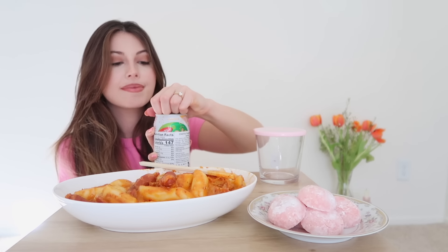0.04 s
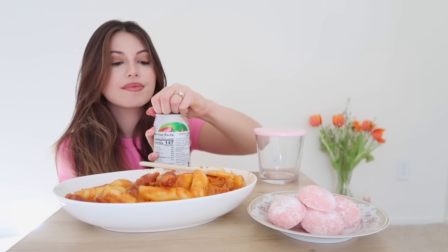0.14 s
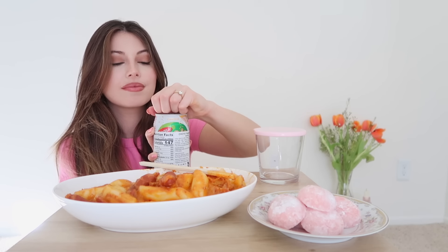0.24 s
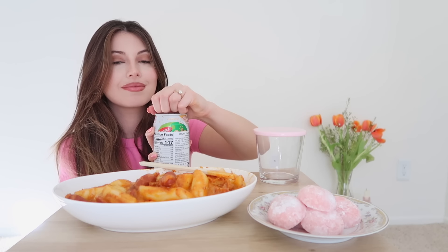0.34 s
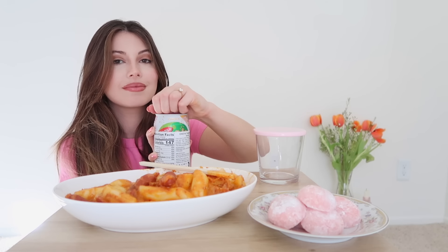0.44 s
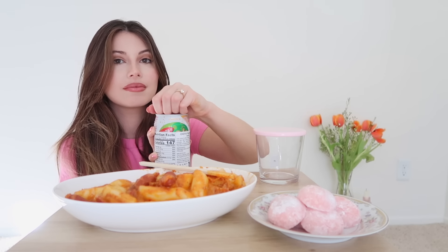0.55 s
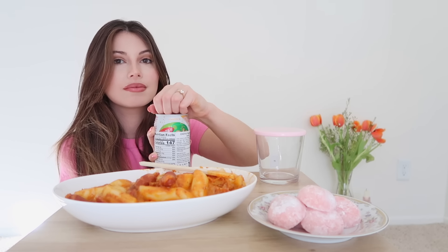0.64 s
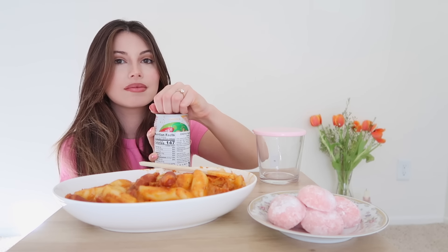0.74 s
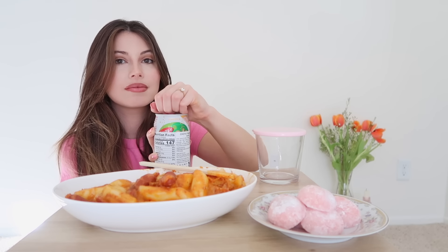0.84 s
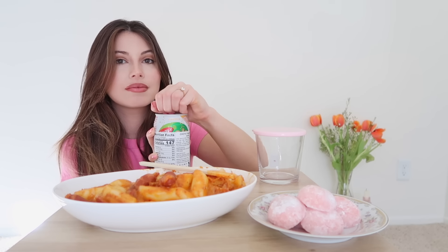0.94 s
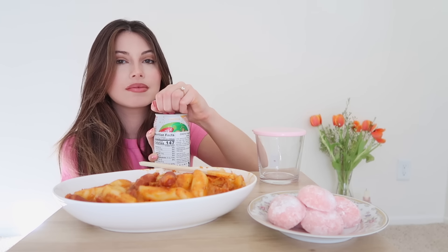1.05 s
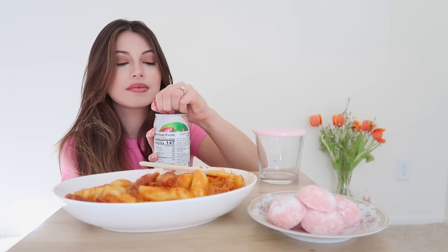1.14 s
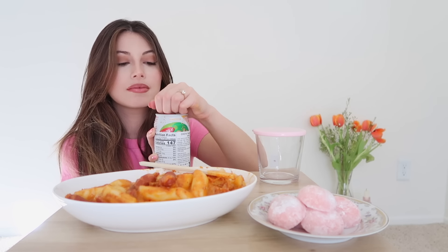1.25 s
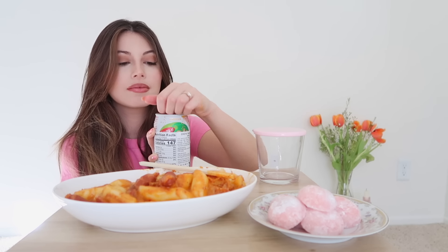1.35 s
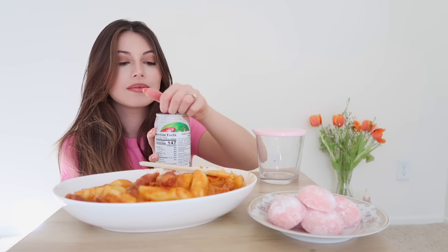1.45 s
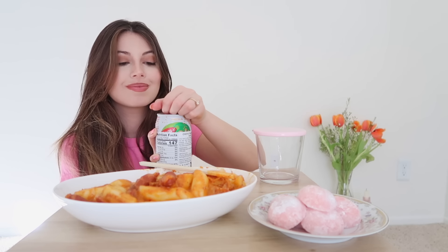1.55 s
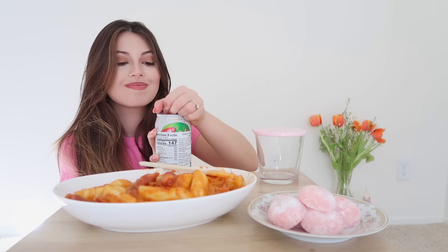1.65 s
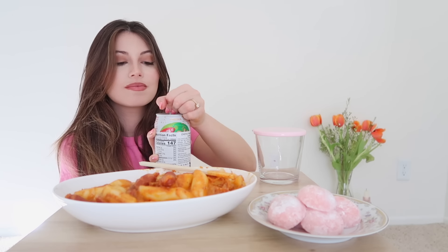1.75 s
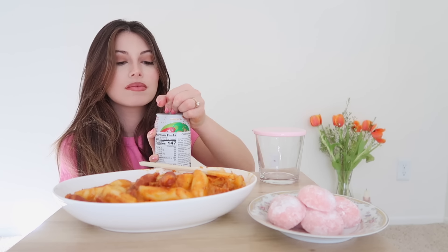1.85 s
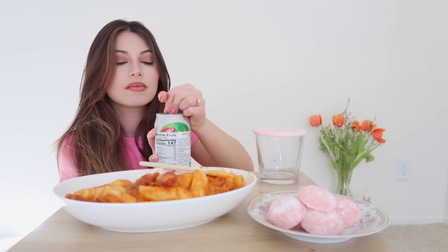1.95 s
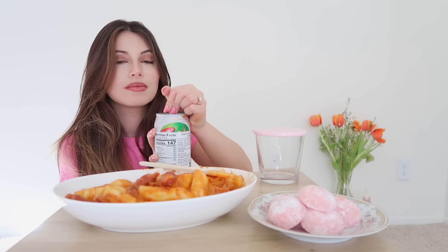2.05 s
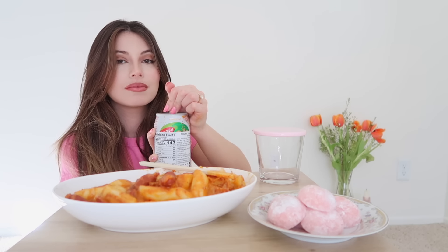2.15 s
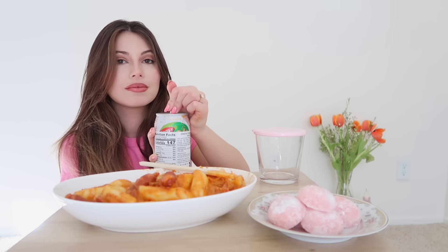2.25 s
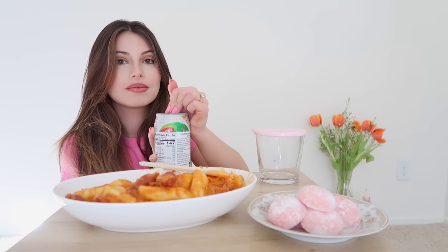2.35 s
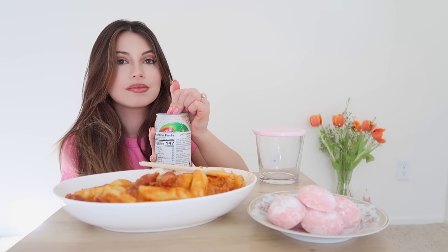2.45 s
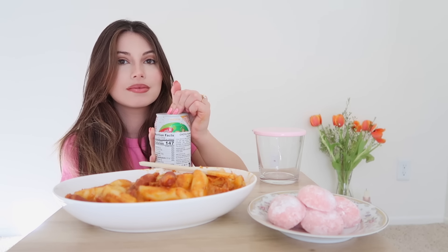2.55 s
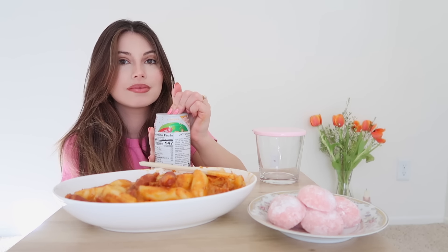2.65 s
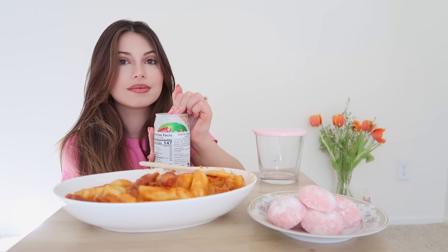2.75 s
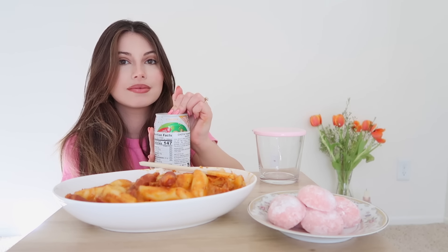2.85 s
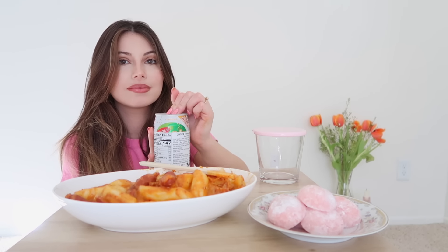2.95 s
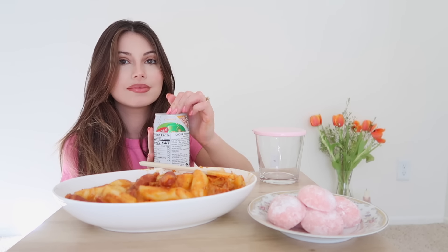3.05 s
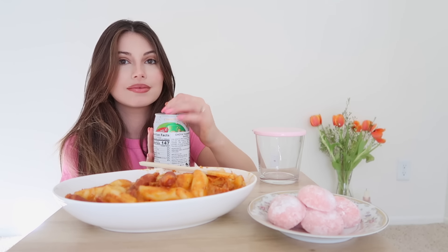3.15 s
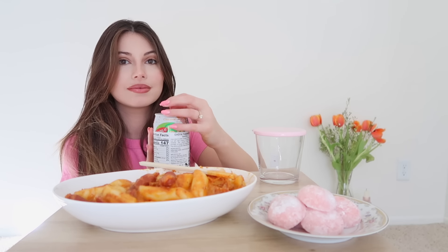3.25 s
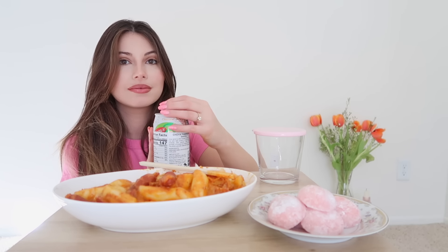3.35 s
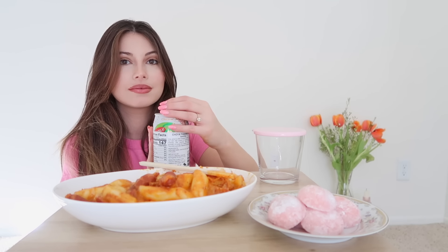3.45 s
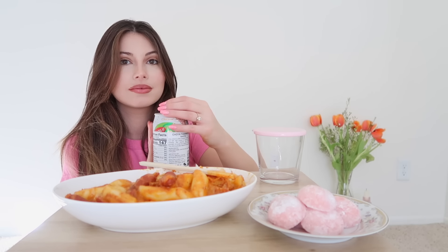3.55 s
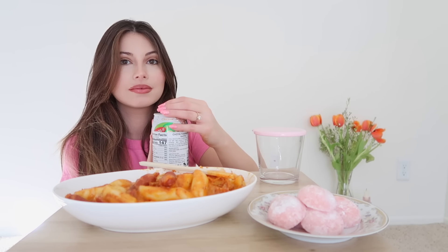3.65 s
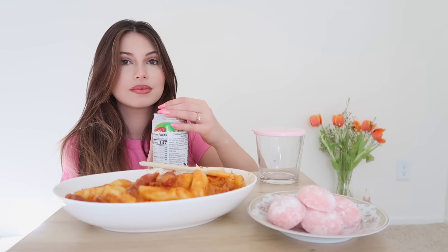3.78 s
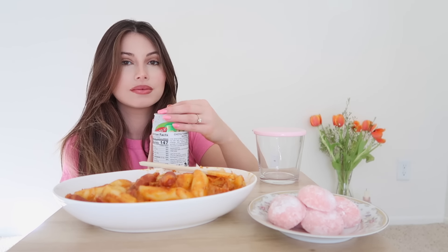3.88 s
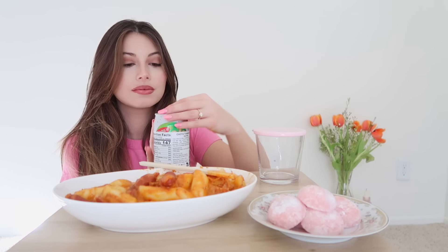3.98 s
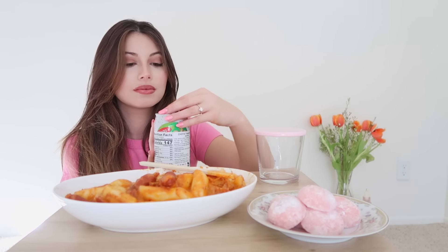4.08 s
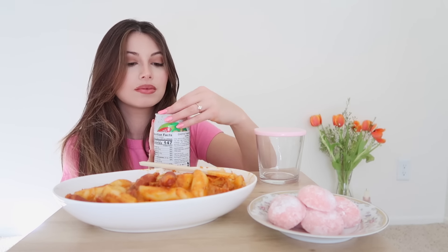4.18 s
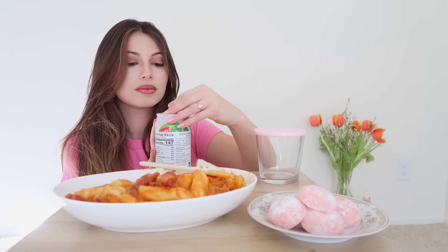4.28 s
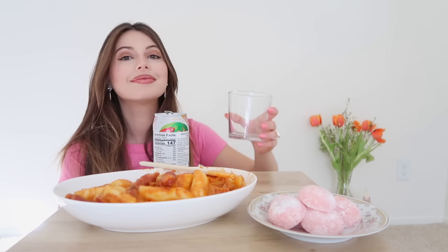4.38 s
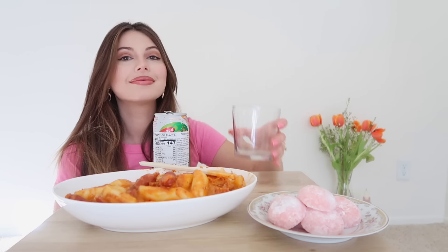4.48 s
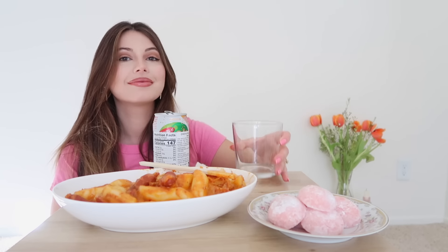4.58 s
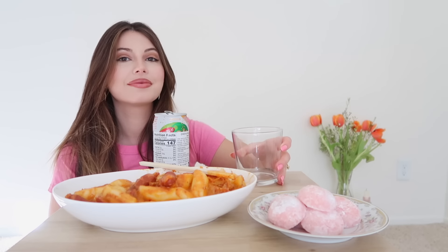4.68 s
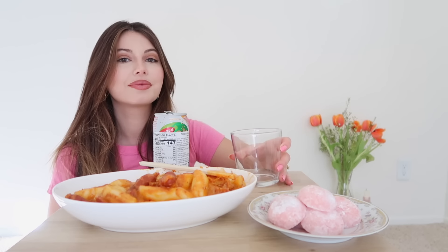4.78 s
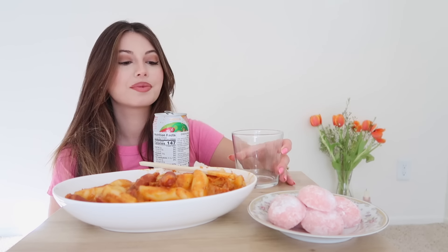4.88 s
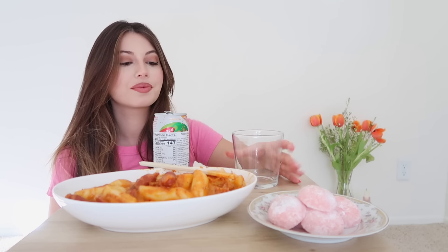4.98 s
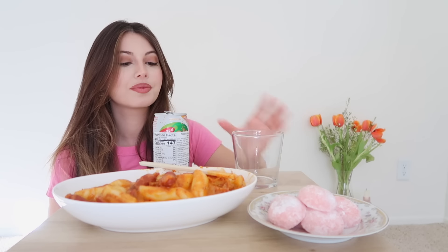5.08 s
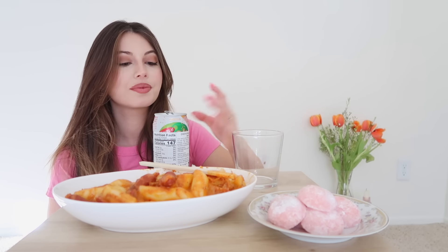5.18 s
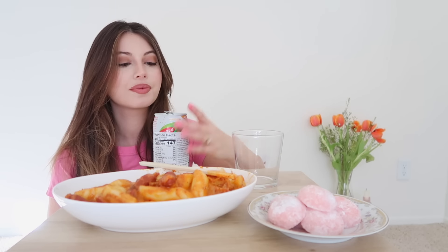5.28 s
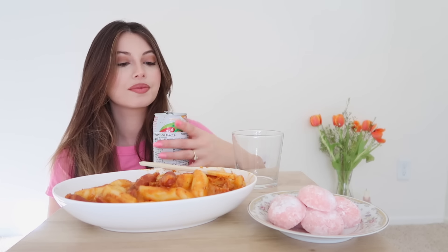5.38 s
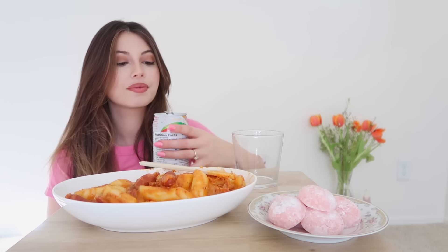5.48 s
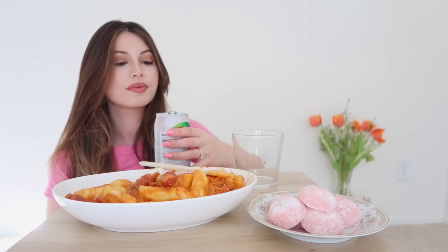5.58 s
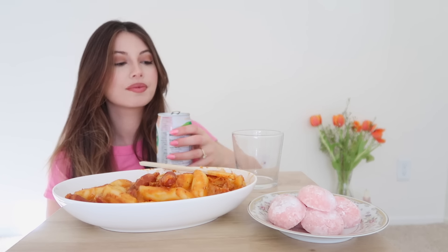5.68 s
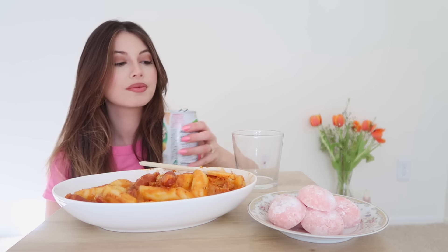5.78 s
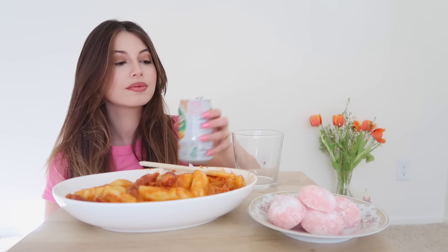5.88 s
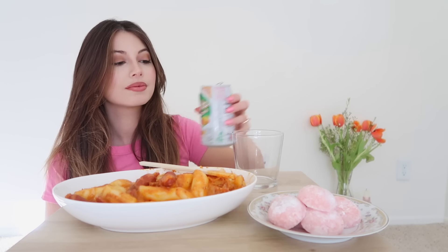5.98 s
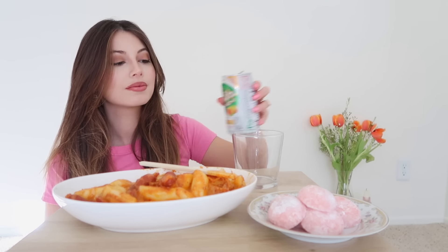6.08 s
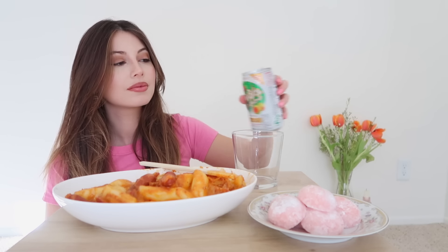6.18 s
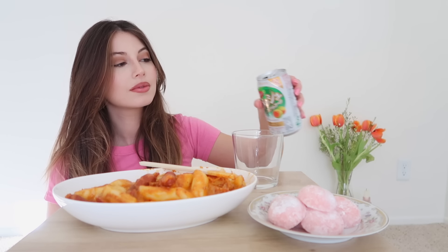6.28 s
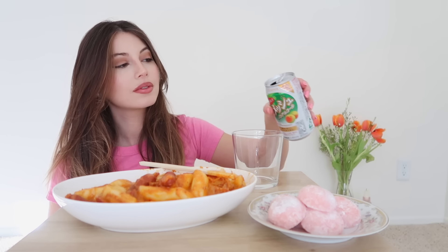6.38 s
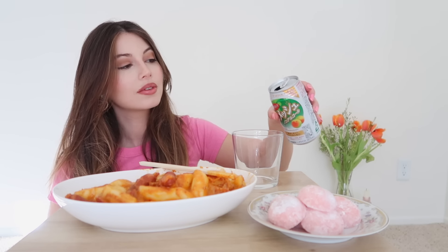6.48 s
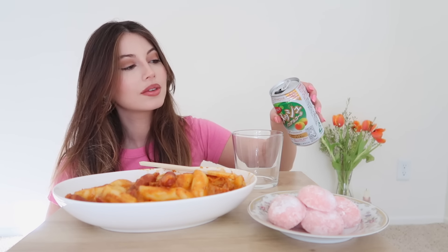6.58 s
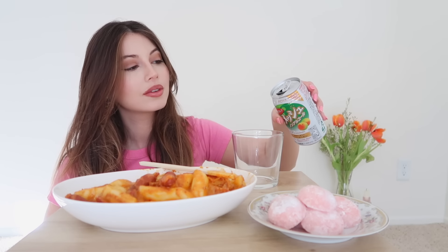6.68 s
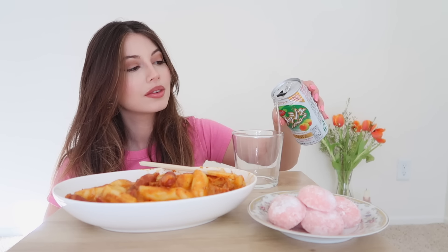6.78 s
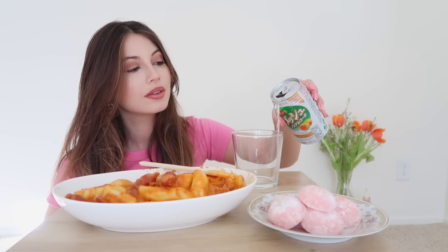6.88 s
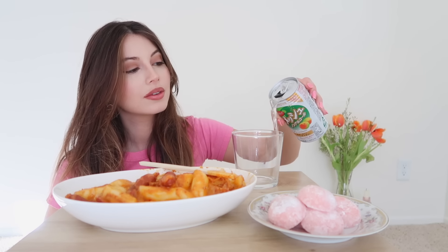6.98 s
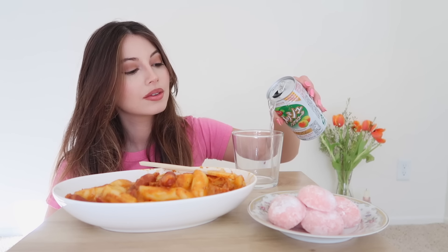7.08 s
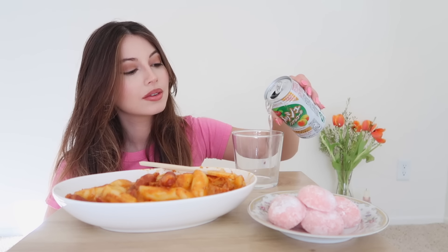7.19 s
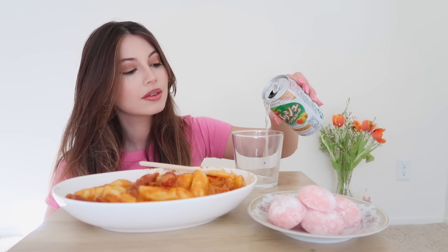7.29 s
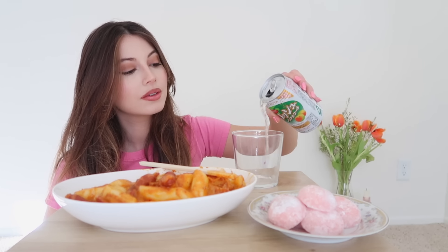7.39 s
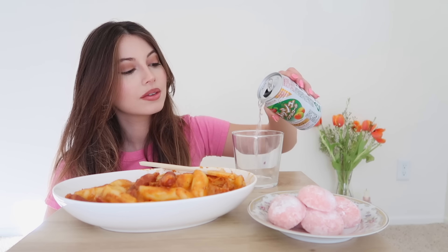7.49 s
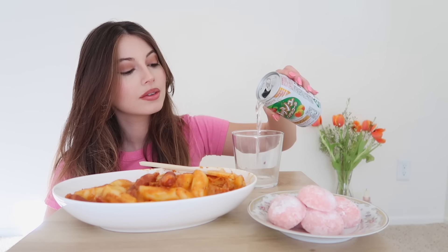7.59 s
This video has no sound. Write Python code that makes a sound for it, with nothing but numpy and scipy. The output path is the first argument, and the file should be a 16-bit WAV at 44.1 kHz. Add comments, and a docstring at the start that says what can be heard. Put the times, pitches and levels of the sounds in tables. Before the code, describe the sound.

Close can opening with sharp metallic snap and tear, dull table bumps, tab crunch, glass knocking down, can scraping away, faint fizzing trickle.

```python
"""A drink can is opened close to a stereo microphone: nails tick on the tab, the lid snaps, tears and rings.
Gas spits from the seal and vents at the tear; the can bumps a wooden table in a small room.
After a hard edit a glass is set down, the can is slid off the table, and a thin stream fizzes in the glass.
Contacts are impulses with chatter through resonances; friction and gas are shaped noise; bubbles are short sines.
Faint room noise, a whine and a fading low hum lie underneath."""
import sys
import numpy as np
from scipy import signal
from scipy.fft import rfft, irfft, next_fast_len
from scipy.io import wavfile
from scipy.ndimage import uniform_filter1d

SR = 44100
rng = np.random.default_rng(int(sys.argv[2]) if len(sys.argv) > 2 else 0)


def inscribe(sig):
    """Save sig as 16-bit PCM at rate SR to the path in sys.argv[1].

    A 1-D sig is mono; a 2-D sig holds one channel per row.
    Samples are clipped to [-1, 1] before scaling.
    """
    pcm = np.round(np.clip(np.atleast_2d(sig).T, -1, 1) * 32767)
    wavfile.write(sys.argv[1], SR, pcm.astype(np.int16))


N = 336483  # samples
EDIT_S = 4.353  # cut between the two shots
TOP_HZ = 15400  # upper band limit

# Levels of contacts and colours are relative: each object's gain is added later.
# nails and tab ticking on the can: start_s, level_db, brightness_db_per_octave
TICKS = [(0.4985, -27, -9), (0.508, -22.5, 2), (0.6375, -31.5, -5), (1.274, -32, -8.5), (1.3595, -35.5, -4),
         (1.3875, -32.5, -3), (1.415, -31.5, -1.5), (1.4495, -29.5, 2), (3.174, -37, -2)]
# resonances of the tab: pitch_hz, width_hz, level_db
TAB_MODES = [(1304, 48, -0.5), (1960, 87, 0.5), (2440, 190, 1.5), (3280, 250, -7.5), (4055, 500, -9),
             (4800, 300, -8.5), (5300, 280, -12)]
# broad spectrum of the tab: pitch_hz, level_db
TAB_COLOUR = [(240, -48.5), (400, -20.5), (1300, -2), (1690, -7.5), (2470, 2), (3400, -5), (5390, -14),
              (6800, -24.5), (15500, -42)]
# the lid snaps under the lever: start_s, level_db, brightness_db_per_octave
SNAPS = [(1.7102, -27, -5.5), (1.7502, -32, -1.5), (1.7572, -3.5, -0.5), (1.7658, -11, 3),
         (1.7679, -9, 0.5)]
# resonances of the shut lid: pitch_hz, width_hz, level_db
SHUT_MODES = [(1940, 190, 1.5), (3880, 320, 0), (4300, 330, -3), (5100, 160, -4.5), (7810, 220, -15),
              (9680, 87, -16)]
# broad spectrum of the shut lid: pitch_hz, level_db
SHUT_COLOUR = [(150, -55), (250, -26.5), (525, -18), (1510, -11), (1850, 4.5), (2710, -16), (4240, -4.5),
               (5690, -23.5), (7900, -18), (15500, -49.5)]
# the scored flap tears in jerks: start_s, level_db, brightness_db_per_octave
TEARS = [(1.773, -10, 2), (1.7752, -2.5, -1), (1.7785, -6, 3), (1.7802, -2, 2.5), (1.7812, -4, -1.5),
         (1.7836, -9, 4), (1.7895, -13, 1.5)]
# resonances of the torn lid: pitch_hz, width_hz, level_db
OPEN_MODES = [(689, 98, -4), (2270, 330, 6.5), (3720, 260, -2), (4340, 150, -11.5), (5155, 360, -7),
              (5480, 41, -7), (5830, 40, -22), (9000, 310, -22)]
# broad spectrum of the torn lid: pitch_hz, level_db
OPEN_COLOUR = [(120, -53.5), (200, -23.5), (470, -28), (677, -7.5), (1500, -9), (2050, -1.5), (3120, -20),
               (3680, -6), (4500, -19), (4920, -12), (6830, -22.5), (15500, -43.5)]
# the tab crunches back flat: start_s, level_db, brightness_db_per_octave
CRUNCH = [(4.3202, -14, 2), (4.3254, -7.5, 2), (4.3305, -18.5, 3), (4.3332, -14.5, 8), (4.3362, -17, 5),
          (4.342, -26.5, -9)]
# resonances of the opened lid under the tab: pitch_hz, width_hz, level_db
FLAT_MODES = [(1760, 130, -1.5), (2360, 170, -0.5), (3860, 200, -2), (4300, 100, -4), (5570, 150, -12.5)]
# broad spectrum of the opened lid under the tab: pitch_hz, level_db
FLAT_COLOUR = [(180, -40.5), (300, -10), (877, -9), (1280, 1), (1640, -7), (1750, 0.5), (3130, -7.5),
               (3940, -2), (4800, -19.5), (5660, -14), (7140, -38), (15500, -53.5)]
# mode clusters of the open can's thin wall: pitch_hz, width_hz, level_db, t60_s
WALL_CLUSTERS = [(1000, 61, -35.5, 0.5), (2200, 190, -34, 0.63), (2760, 80, -42.5, .35),
                 (3800, 170, -42, 0.6), (5360, 160, -44.5, 0.58), (9300, 390, -46.5, 0.2)]
# the wall's clearest single modes: pitch_hz, level_db, t60_s
WALL_MODES = [(2067, -28, .36), (2151, -26.5, .38), (2331, -34, 0.45), (3763, -29.5, .58), (3925, -39, .45),
              (4867, -41, .44), (5211, -38.5, .47), (5496, -41, .42), (9500, -44, .25)]
# the tab slips on its rivet: peak_s, level_db
SLIPS = [(4.2937, -39), (4.299, -30), (4.310, -38)]
SLIP_RISE_S, SLIP_FALL_S = 0.023, 0.032  # all rises and falls are times for 60 dB
# resonances of the slipping tab: pitch_hz, width_hz, level_db
SQUEAK_MODES = [(880, 200, 2), (2790, 210, 1.5), (4610, 300, -4)]
# broad spectrum of the slipping tab: pitch_hz, level_db
SQUEAK_COLOUR = [(120, -22), (350, -3), (1000, -5), (1700, -9), (2400, -13), (3600, -20), (5200, -28),
                 (6500, -29), (12000, -35), (15500, -54.5)]
# spectrum of gas at the seal: pitch_hz, level_db
JET_COLOUR = [(180, -51.5), (300, -26), (685, -18.5), (1490, -19.5), (1910, -2.5), (2480, -5), (3020, -9.5),
              (4720, -6), (8420, -20.5), (9140, -15), (13400, -19), (15500, -26)]
# spectrum of gas escaping through the opened flap: pitch_hz, level_db
VENT_COLOUR = [(2000, -25), (5000, -6), (8000, -8), (9500, 0), (12000, -2), (15000, -14)]
LEAK_DB = -57  # thin hiss until the spit
SPIT_S, SPIT_DB, SPIT_RISE_S, SPIT_FALL_S = .149, -25.5, .11, .11  # gas spits as the seal cracks
VENT_S, VENT_DB, VENT_RISE_S, VENT_FALL_S = 1.79, -41, .03, .26
# fingertips scratch on the lid before they catch: peak_s, level_db
SCRATCHES = [(1.463, -53), (1.543, -47), (1.607, -51), (2.432, -45.5), (3.1, -56.5), (3.655, -56),
             (3.941, -46), (4.241, -56)]
SCRATCH_RISE_S, SCRATCH_FALL_S = 0.061, 0.067
# resonances of the scratched lid: pitch_hz, width_hz, level_db
SCRATCH_MODES = [(2510, 200, 4), (3120, 200, -5)]
# broad spectrum of the scratched lid: pitch_hz, level_db
SCRATCH_COLOUR = [(400, -32), (1200, -8.5), (1700, -11), (2500, -2.5), (3400, -8.5), (4100, -17),
                  (5200, -14), (7000, -30.5), (15500, -55)]
# the can bumps the table and its tab rattles:
# start_s, level_db, brightness_db_per_octave, rattle_db (relative to the bump)
BUMPS = [(0.5596, -28.5, 0, -19), (1.281, -27.5, -0.5, -3), (1.549, -24, 1.5, -9.5), (1.779, -17, -2, -19),
         (2.4332, -14.5, 1, -3.5), (2.4527, -23, -0.5, -22), (3.37, -40, 3, -14), (4.067, -31, -5, -15.5),
         (4.2791, -26.5, -0.5, -11), (4.3005, -21, -1.5, -21), (5.776, -25.5, 4, -24),
         (5.7927, -25, 3, -24), (5.7995, -27, 3, -14)]
# resonances of the full can on the table: pitch_hz, width_hz, level_db
BUMP_MODES = [(132, 20, -3.5), (187.4, 15, 0.5), (485.6, 14, -5), (1240, 43, -18.5), (1745, 51, -20),
              (2470, 60, -25.5), (2980, 50, -25)]
# broad spectrum of the full can on the table: pitch_hz, level_db
BUMP_COLOUR = [(35, -46), (60, -17), (167, -6), (230, -8), (560, -4.5), (808, -13.5), (1100, -26.5),
               (3250, -30.5), (3990, -39.5), (8000, -62.5), (15500, -110)]
# resonances of the rattling tab: pitch_hz, width_hz, level_db
RATTLE_MODES = [(1250, 91, -1), (1800, 160, 2), (2500, 220, -1), (3140, 420, -1)]
# broad spectrum of the rattling tab: pitch_hz, level_db
RATTLE_COLOUR = [(300, -35.5), (900, -10.5), (1300, -6), (1800, 0), (2250, -6.5), (2550, -5), (3500, -5),
                 (4100, -29.5), (5000, -46), (8000, -57.5), (15500, -75)]
RATTLE_GAP_S, RATTLE_LOSS_DB = 0.0045, 4.5  # from the first strike on the lid to the softer second
GRIP_DB, GRIP_HOLD_S = -58, 1.7  # the hand rubs on the full can while it works the tab
# the glass base strikes the table, one edge first, then flat: start_s, level_db, brightness_db_per_octave
LANDINGS = [(4.8707, 0, 1), (4.923, -14.5, -6), (4.9385, -12, -0.5), (4.9965, -4, 0.5), (5.0003, -2.5, 0),
            (5.0075, -2, 1), (5.053, -18, -5.5)]
# after landing the glass rocks: start_s (first contact), level_db, gap_s
ROCKING = [(4.8834, -8.5, .0135), (5.0105, -8, .0155)]
ROCK_LOSS_DB = 3  # per contact
ROCK_BRIGHT_DB, ROCK_DULLING_DB = -2, 2.5  # first brightness in dB per octave, and its loss per contact
# the first drops slap the glass bottom: start_s, level_db, brightness_db_per_octave
SLAPS = [(7.246, -37, 5.5), (7.251, -38.5, 7), (7.26, -40.5, 6), (7.4073, -38.5, -4), (7.492, -49, 10)]
# resonances of the table top: pitch_hz, width_hz, level_db
TABLE_MODES = [(392, 25.5, 4), (492, 11.7, 8.5), (594, 19, 1.5), (642.5, 15, 3), (886, 24, 3.5),
               (957, 16, -0.5), (1180, 55, -5), (1240, 53, 3), (1360, 36, -2), (1777, 45, -2.5),
               (1980, 45, -11), (2390, 40, -13), (2800, 90, -20.5), (3610, 260, -25)]
# broad spectrum of the table top: pitch_hz, level_db
TABLE_COLOUR = [(41, -50.5), (70, -19), (234, -11), (272, -20.5), (335, -7), (450, -1.5), (600, -4.5),
                (869, -0.5), (1260, 0.5), (1460, -8), (1730, -8), (2340, -15), (4560, -37.5), (15500, -106)]
# short ring of the thick glass, damped by the hand: pitch_hz, width_hz, level_db
GLASS_MODES = [(2620, 36, 7.5), (3000, 57, 3), (3290, 35, -2), (3564, 35, -3), (4040, 40, -7.5)]
# broad spectrum of the glass: pitch_hz, level_db
GLASS_COLOUR = [(800, -45.5), (2300, -6.5), (4200, -15), (5200, -31.5), (15500, -62)]
# the hand shoves the can over the wood: peak_s, level_db, rise_s
SHOVES = [(4.061, -47, 0.19), (5.578, -39, 0.085), (5.627, -39, 0.069), (5.651, -40, 0.055),
          (5.669, -32, 0.088), (5.738, -46, 0.19)]
SHOVE_FALL_S = 0.12
DRAG_S, DRAG_HOLD_S, DRAG_DB = 5.575, .19, -45.5  # steady drag under the shoves, until the can lifts
# resonances of the sliding can: pitch_hz, width_hz, level_db
SLIDE_MODES = [(507, 84, 2.5), (607, 120, 2.5), (1264, 76, 3), (1625, 120, 2), (2525, 170, 0),
               (3060, 210, -7.5)]
# broad spectrum of the sliding can: pitch_hz, level_db
SCRAPE_COLOUR = [(59, -47.5), (100, -21.5), (187, 1), (396, -9), (571, 5), (886, -5), (1510, -20),
                 (1780, 3), (2060, -21), (3260, -14), (4060, -23), (8000, -54), (15500, -110)]
TILT_S, TILT_TIME_S, TILT_PITCH = 5.72, 0.056, 0.88  # tipping lowers the resonances by this ratio
# the rim sings when pushed hardest: pitch_hz, width_hz, level_db
RASPS = [(3290, 35, -36.5), (2570, 110, -37)]
RASP_S, RASP_RISE_S, RASP_FALL_S = 5.668, 0.15, 0.081
# the rim clinks as it leaves the table: start_s, level_db, brightness_db_per_octave
CLINKS = [(5.799, -25.5, 1)]
# resonances of the rim: pitch_hz, width_hz, level_db
RIM_MODES = [(2460, 35, -1), (2980, 48, -6), (3320, 35, -16)]
POUR_S, FOAM_DB, FOAM_GROWTH_DB_PER_S = 7.265, -72, 13  # the foam builds up as the glass fills
# spurts of the stream froth up: peak_s, level_db
SPURTS = [(7.285, -58), (7.41, -65), (7.508, -66.5)]
SPURT_RISE_S, SPURT_FALL_S = 0.1184, 0.1
# spectral weighting of the bubble clouds: pitch_hz, level_db
FOAM_COLOUR = [(500, -14), (1500, -15.5), (3000, -3.5), (5500, -2), (8500, -2.5), (13000, 2), (15000, -6)]
DRUM_HZ, DRUM_WIDTH_HZ, DRUM_DB = 190, 14, -58  # the stream drums softly on the glass bottom
BURBLE_DB = -66  # larger bubbles that the stream drags under
# small pings: a faint early blip, the sprung tab ringing near 3.19 s, later bubbles in the glass:
# start_s, pitch_hz (at the start), level_db, t60_s
PINGS = [(0.316, 2220, -42, .02), (3.19, 2500, -43, 0.066), (3.193, 3970, -50.5, 0.097),
         (7.2882, 8200, -32.5, 0.0041), (7.2905, 8900, -32, 0.003), (7.407, 3070, -49, 0.024),
         (7.501, 2940, -40, 0.03), (7.551, 8700, -53, 0.017), (7.618, 3230, -47, 0.013),
         (7.625, 2900, -44, 0.017)]
# spectrum of the room noise: pitch_hz, level_db
AIR_COLOUR = [(12, -33), (20, -7), (59, -7), (92, -2.5), (191, -10), (266, -8.5), (465, -13.5), (565, -17),
              (1130, -19.5), (10500, -40), (13900, -53.5), (15500, -60)]
# stereo spread of the room noise: pitch_hz, side_db
AIR_SIDE = [(60, -23.5), (150, -5.5), (380, 0.5), (950, -1.5), (2380, -0.5), (3700, 0), (4200, 5),
            (4800, -1), (15000, -1.5)]
AIR_DB = -53
WHINE_HZ, WHINE_DB = 13006, -82
HUM_DB, HUM_FADE_S = -50, 11  # level at the edit, then time to fall 60 dB
# reverberation of the room: pitch_hz, t60_s
ROOM_T60 = [(100, 0.48), (260, 0.4), (700, 0.34), (2000, 0.37), (5000, 0.46), (8000, 0.41), (12000, 0.12)]
# the echo is central in the bass and diffuse in the treble: pitch_hz, side_db
ROOM_SIDE = [(1500, -20), (4000, -6.5), (8000, 4)]
# close sounds are central in the bass and spread out in the treble: pitch_hz, side_db
WIDTH = [(2000, -40.5), (3000, -22.5), (4200, -9.5), (5700, -1.5), (7200, 2), (10000, 8), (14000, 3.5)]


def opening():
    """Impact excitation: snaps of the shut lid, the tear and the flattened tab each drive the lid's modes."""
    snaps = blows(SNAPS, body(SHUT_COLOUR, SHUT_MODES, broad_db=-7.0), gain_db=10.5,
                  chatter=0.45, chatter_t60=0.0044, wet_db=-4.0, pivot_hz=3060)
    tears = blows(TEARS, body(OPEN_COLOUR, OPEN_MODES, broad_db=2.5), gain_db=15.5,
                  chatter=1.0, chatter_t60=0.027, wet_db=-8.5, pivot_hz=2460)
    crunch = blows(CRUNCH, body(FLAT_COLOUR, FLAT_MODES, broad_db=-2.0), gain_db=9.0,
                   chatter=0.75, chatter_t60=0.018, wet_db=-10.0, pivot_hz=3000)
    return ticks(TICKS) + snaps + tears + crunch + ring() + squeak()


def ticks(rows):
    """Impact excitation: light contacts set the tab's resonances sounding."""
    return blows(rows, body(TAB_COLOUR, TAB_MODES, broad_db=-6.5), gain_db=10.5,
                 chatter=2.7, chatter_t60=0.0067, wet_db=-6.0, pivot_hz=3020)


def ring(start_s=1.781, wall_db=0, size=32768):
    """Modal decay with beating: close modes of the wall interfere as they fade; a few stand out clearly."""
    track, t = np.zeros(N), np.arange(size) / SR
    for centre, width, db, t60 in WALL_CLUSTERS:  # each cluster dies at its own speed
        fade = amp(db + wall_db - 60 * t / t60)
        add(track, start_s, fade * band(centre, width, size))
    for hz, db, t60 in WALL_MODES:
        fade = amp(db - 60 * t / t60)
        add(track, start_s, fade * np.sin(2 * np.pi * (hz * t + rng.random())))
    return track


def squeak():
    """Stick-slip friction: the tab grates on its rivet in quick jerks."""
    jerks = grains(rate=8000, spread_db=1.1) * judder(rate_hz=500, depth_db=3.0)
    rub = unit(filtered(jerks, body(SQUEAK_COLOUR, SQUEAK_MODES, broad_db=-7)))
    slips = sum(envelope(s, db, SLIP_RISE_S, SLIP_FALL_S) for s, db in SLIPS)
    return room(rub * slips, wet_db=-9.5)[:, :N]


def gas():
    """Jet noise: a leak at the seal swells into one short spit; the rest hisses out when the flap opens."""
    spit = envelope(SPIT_S, SPIT_DB, SPIT_RISE_S, SPIT_FALL_S)
    leak = envelope(0, LEAK_DB, rise_s=.01, fall_s=.1, hold_s=SPIT_S)
    jet = unit(filtered(rng.standard_normal(N), lambda hz: amp(along(JET_COLOUR, hz))))
    vent = unit(filtered(rng.standard_normal(N), lambda hz: amp(along(VENT_COLOUR, hz))))
    vent_flow = envelope(VENT_S, VENT_DB, VENT_RISE_S, VENT_FALL_S)
    return room((spit + leak) * jet + vent_flow * vent, wet_db=-11.0)[:, :N]


def scratches():
    """Friction as random impulses: nails drag in short gritty strokes over the lid."""
    grit = grains(rate=2500, spread_db=3.5)
    rub = unit(filtered(grit, body(SCRATCH_COLOUR, SCRATCH_MODES, broad_db=-2)))
    strokes = sum(envelope(s, db, SCRATCH_RISE_S, SCRATCH_FALL_S) for s, db in SCRATCHES)
    return room(rub * strokes, wet_db=-8.5)[:, :N]


def bumps(rows):
    """Coupled impact: the full can knocks dully on the table top, and each knock makes the tab clack twice."""
    knocks = blows([row[:3] for row in rows], body(BUMP_COLOUR, BUMP_MODES, broad_db=-6.5), gain_db=17.5,
                   chatter=0.9, chatter_t60=0.1, wet_db=-7.5, pivot_hz=687)
    strikes = [(s + k * RATTLE_GAP_S, db + rattle_db - k * RATTLE_LOSS_DB, 0)
               for s, db, _, rattle_db in rows for k in (0, 1)]
    clacks = blows(strikes, body(RATTLE_COLOUR, RATTLE_MODES, broad_db=-2), gain_db=8.5,
                   chatter=1.5, chatter_t60=.018, wet_db=-11.5, pivot_hz=2200)
    return knocks + clacks


def grip():
    """Forced vibration: the hand's small movements make the full can rumble."""
    rumble = filtered(rng.standard_normal(N), body(BUMP_COLOUR, BUMP_MODES, broad_db=-5))
    rumble = unit(rumble * judder(rate_hz=12, depth_db=2))
    rumble = unit(filtered(rumble, lambda hz: 1 / (1 + (hz / 330) ** 2)))
    return rumble * envelope(0, GRIP_DB, rise_s=.05, fall_s=.5, hold_s=GRIP_HOLD_S)


def glass():
    """Structure-borne impact: the glass base rings the table and clinks; drops knock the table through it."""
    contacts = LANDINGS + rocking()
    table = blows(contacts + SLAPS, body(TABLE_COLOUR, TABLE_MODES, broad_db=-4.0), gain_db=13.0,
                  chatter=0.87, chatter_t60=0.034, wet_db=-8.0, pivot_hz=1010)
    clink = blows(contacts, body(GLASS_COLOUR, GLASS_MODES, broad_db=-1.5), gain_db=-6.5,
                  chatter=.6, chatter_t60=.012, wet_db=-14, pivot_hz=2970)
    return table + clink


def rocking(count=4):
    """Energy loss at repeated impacts: each contact of the rocking glass is softer and duller."""
    return [(s + k * gap_s, db - k * ROCK_LOSS_DB, ROCK_BRIGHT_DB - k * ROCK_DULLING_DB)
            for s, db, gap_s in ROCKING for k in range(count)]


def slide():
    """Stick-slip friction: the can's rim slips over the wood, sings at the hardest shove, tips and clinks."""
    push = sum(envelope(s, db, rise_s, SHOVE_FALL_S) for s, db, rise_s in SHOVES)
    push = push + envelope(DRAG_S, DRAG_DB, rise_s=0.096, fall_s=0.113, hold_s=DRAG_HOLD_S)
    catches = grains(rate=3000, spread_db=1.5) * judder(rate_hz=140, depth_db=1.0)
    can = body(SCRAPE_COLOUR, SLIDE_MODES, broad_db=0.5)
    flat = unit(filtered(catches, can))
    tipped = unit(filtered(catches, lambda hz: can(hz / TILT_PITCH)))
    tilt = np.clip((np.arange(N) / SR - TILT_S) / TILT_TIME_S, 0, 1)
    rub = np.sqrt(1 - tilt) * flat + np.sqrt(tilt) * tipped  # crossfade to the lower resonances
    rasp = sum(envelope(RASP_S, db, RASP_RISE_S, RASP_FALL_S) * tone(hz, width) for hz, width, db in RASPS)
    rasp = rasp * judder(rate_hz=300, depth_db=1.5)
    clink = blows(CLINKS, body(RATTLE_COLOUR, RIM_MODES, broad_db=-16), gain_db=10,
                  chatter=.4, chatter_t60=.005, wet_db=-10, pivot_hz=2710)
    return room(push * rub + rasp, wet_db=-9.0)[:, :N] + clink


def pour():
    """Bubble resonance: tiny bubbles burst in the growing foam, louder around each spurt of the stream."""
    pouring_s = np.arange(N) / SR - POUR_S
    foam = amp(FOAM_DB + FOAM_GROWTH_DB_PER_S * pouring_s) * (pouring_s > 0)
    froth = sum(envelope(s, db, SPURT_RISE_S, SPURT_FALL_S) for s, db in SPURTS)
    drink = (foam + froth) * bubbles(count=2500)
    drink += (pouring_s > 0) * amp(DRUM_DB) * tone(DRUM_HZ, DRUM_WIDTH_HZ)
    drink += amp(BURBLE_DB) * bubbles(count=60, pitch_hz=2400, spread=.45, cycles=10)
    return room(drink, wet_db=-11.0)[:, :N]


def bubbles(count=2500, pitch_hz=7000, spread=1.0, cycles=7, spread_db=4, size=256):
    """Damped oscillators: a cloud of bubbles, each a few dying cycles at its own pitch, rms 1."""
    start, t = round(POUR_S * SR), np.arange(size) / SR
    when, pitch, strength = rng.random(count), rng.standard_normal(count), rng.standard_normal(count)
    hz = pitch_hz * np.exp(spread * pitch)[:, None]
    pops = np.exp(-hz * t / cycles) * np.sin(2 * np.pi * hz * t)
    pops *= amp(spread_db * strength)[:, None] * (hz < TOP_HZ)
    at = (start + when * (N - start)).astype(int)[:, None] + np.arange(size)
    cloud = np.bincount(at.ravel(), pops.ravel(), N)[:N]
    cloud = filtered(cloud, lambda hz: amp(along(FOAM_COLOUR, hz)))
    return cloud / np.std(cloud[start:])


def pings(glide=0.22):
    """Damped sine with an upward glide: an early blip, the ringing tab, then single bubbles in the glass."""
    track, t = np.zeros(N), np.arange(SR // 6) / SR
    for s, hz, db, t60 in PINGS:
        swell_and_fade = amp(db - 60 * t / t60) * (1 - np.exp(-t / 0.00034))
        add(track, s, swell_and_fade * np.sin(2 * np.pi * hz * t * (1 + glide * t)))
    return room(track, wet_db=-11.0)[:, :N]


def background(hum_hz=103, hum_width_hz=2):
    """Stationary noise and tones: soft room noise, a faint electrical whine, and a hum clearest at the edit."""
    mid = filtered(rng.standard_normal(N), lambda hz: amp(along(AIR_COLOUR, hz)))
    side = filtered(rng.standard_normal(N), lambda hz: amp(along(AIR_COLOUR, hz) + along(AIR_SIDE, hz)))
    air = amp(AIR_DB) * np.array([mid + side, mid - side]) / np.std(mid)
    whine = amp(WHINE_DB) * np.sin(2 * np.pi * WHINE_HZ * np.arange(N) / SR)
    hum = tone(hum_hz, hum_width_hz) * envelope(EDIT_S, HUM_DB, rise_s=.05, fall_s=HUM_FADE_S)
    return air + np.array([whine, -whine]) + hum


def blows(rows, gain, gain_db, chatter, chatter_t60, wet_db, pivot_hz, size=8192):
    """Source and filter: each contact is a push and a dying chatter, coloured by the object and the room."""
    track, t, hz = np.zeros((2, N)), np.arange(size) / SR, np.fft.rfftfreq(size, 1 / SR)
    octaves = np.clip(np.log2((hz + 1) / pivot_hz), -2, 2)
    # in a plate, high bending waves arrive before low ones
    bending = np.exp(-2j * np.pi * .0016 * np.sqrt(hz * pivot_hz))
    for s, db, bright_db in rows:
        force = rng.standard_normal(size) * amp(-60 * t / chatter_t60)
        force *= chatter / np.linalg.norm(force)
        force[0] += 1
        response = bending * causal(gain(hz) * amp(bright_db * octaves))
        hit = irfft(rfft(force) * response)
        add(track, s, room(amp(db + gain_db) * hit / np.linalg.norm(hit), wet_db))
    return track


def body(colour, modes, broad_db):
    """Modal superposition: gain by frequency of an object, resonances standing on a broad colour."""
    def gain(hz):
        broad = along(colour, hz)
        peaks = sum(np.abs(amp(db) * hz * w / (c * c - hz * hz + 1j * hz * w)) ** 3 for c, w, db in modes)
        deepening = amp(np.minimum(broad + 20, 0) / 2)  # where the colour is below -20 dB
        return np.cbrt(peaks + amp(broad + broad_db) ** 3) * deepening
    return gain


def causal(gain):
    """Minimum phase: the causal response that has this gain, by folding the cepstrum."""
    cepstrum = irfft(np.log(np.maximum(gain, 1e-6)))
    half = len(cepstrum) // 2
    cepstrum[1:half] *= 2
    cepstrum[half + 1:] = 0
    return np.exp(rfft(cepstrum))


def room(x, wet_db):
    """Reverberation: the direct sound and a fresh tail of noise that decays at each frequency's own rate."""
    hz, t, z = signal.stft(rng.standard_normal((2, SR // 2)), SR, nperseg=256)
    z[1] *= amp(along(ROOM_SIDE, hz))[:, None]
    decay = amp(-60 * t / along(ROOM_T60, hz)[:, None]) * (1 - np.exp(-t / 0.0017))
    tails = signal.istft(z * decay, SR, nperseg=256)[1]
    mid, side = amp(wet_db) * tails / np.linalg.norm(tails[0])
    mid[0] += 1
    return signal.fftconvolve(x[None], np.array([mid + side, mid - side]), axes=1)


def widen(pair, scatter_s=0.00079, order=300):
    """Decorrelation: short scattered paths make the treble differ between the two capsules."""
    def scatter(hz):
        delay = scatter_s * np.abs(unit(uniform_filter1d(rng.standard_normal(len(hz)), order)))
        return amp(along(WIDTH, hz)) * np.exp(-2j * np.pi * np.cumsum(delay) * hz[1])
    side = filtered(pair.mean(axis=0), scatter)
    return pair + np.array([side, -side])


def grains(rate, spread_db):
    """Shot noise: random tiny impulses of uneven size, about rate a second, rms 1."""
    sizes = rng.standard_normal(N) * amp(spread_db * rng.standard_normal(N))
    return unit(sizes * (rng.random(N) < rate / SR))


def judder(rate_hz, depth_db):
    """Amplitude modulation: uneven gain of a contact that sticks and slips, rms 1."""
    knots = np.clip(rng.standard_normal(N), -2, 2)
    return unit(amp(depth_db * np.interp(np.arange(N) * rate_hz / SR, np.arange(N), knots)))


def tone(hz, width_hz, size=128):
    """Phase diffusion: a sine whose phase drifts smoothly."""
    drift = np.cumsum(uniform_filter1d(rng.standard_normal(N), size)) * np.sqrt(2 * np.pi * width_hz / SR)
    return np.sin(2 * np.pi * hz * np.arange(N) / SR + drift)


def band(centre, width, size):
    """Narrow-band noise: a cluster of close modes, rms 1."""
    offset = (np.fft.rfftfreq(size, 1 / SR) - centre) / width
    return unit(irfft(rfft(rng.standard_normal(size)) / (1 + (offset ** 2) ** 2), size))


def envelope(s, db, rise_s, fall_s, hold_s=0):
    """Exponential growth and decay: climbs 60 dB in rise_s to db at s, holds, drops 60 dB in fall_s."""
    t = np.arange(N) / SR - s
    return amp(db - 60 * np.clip(np.maximum(-t / rise_s, (t - hold_s) / fall_s), 0, 2))


def filtered(x, response):
    """Linear filtering: x times a response of frequency."""
    m = next_fast_len(N + SR // 4)
    return irfft(rfft(x, m) * response(np.fft.rfftfreq(m, 1 / SR)), m)[..., :N]


def along(points, hz):
    """Logarithmic frequency axis: (pitch_hz, value) points interpolated at hz."""
    f, v = np.transpose(points)
    return np.interp(np.log(hz + 1), np.log(f + 1), v)


def add(track, s, x):
    """Superposition: mix x into the track at time s."""
    part = track[..., max(round(s * SR), 0):][..., :x.shape[-1]]
    part += x[..., :part.shape[-1]]


def amp(db):
    """Level to amplitude: decibels to gain."""
    return 10 ** (np.asarray(db) / 20)


def unit(x):
    """Normalisation: x scaled to rms 1."""
    return x / np.sqrt(np.mean(x ** 2) + 1e-20)


def scene():
    """Superposition of two shots; a hard edit cuts the echo of the first one's handling, lid and gas."""
    handling = grip() + scratches() + bumps([r for r in BUMPS if r[0] < EDIT_S])
    first = widen(opening()) + widen(gas()) + widen(handling)
    first = first * (np.arange(N) < EDIT_S * SR)
    second = glass() + bumps([r for r in BUMPS if r[0] >= EDIT_S])
    # the slide's first shove and the early pings also sound before the edit
    return first + widen(second + slide() + pour() + pings()) + background()


def record(dry, threshold_db=-15, release_db=7, ceiling=1.0):
    """Gain control: loud bursts duck the level, which recovers release_db a second; then clip and band-limit."""
    power = np.abs(uniform_filter1d(dry.mean(axis=0) ** 2, size=512))
    over = np.maximum(10 * np.log10(power + 1e-12) - threshold_db, 0)
    recovery = release_db * np.arange(N) / SR
    duck = np.maximum.accumulate(over + recovery) - recovery
    lagged = signal.lfilter(np.ones(512) / 512, 1, duck)  # mean of the last 512 samples
    clipped = np.clip(dry * amp(-lagged), -ceiling, ceiling)
    return filtered(clipped, lambda hz: hz < TOP_HZ)


dry = scene()
out = record(dry)
inscribe(out)
```